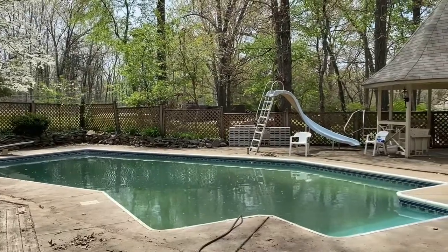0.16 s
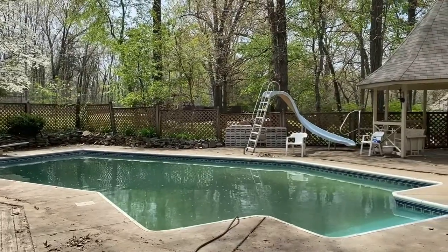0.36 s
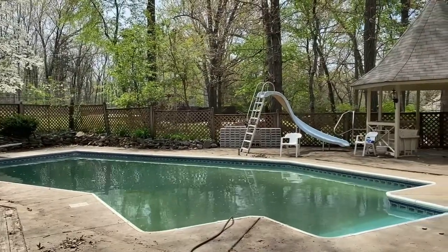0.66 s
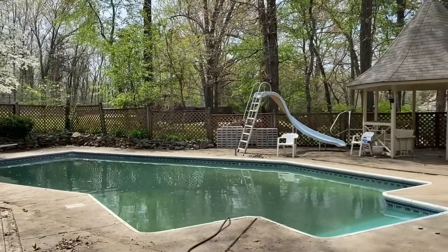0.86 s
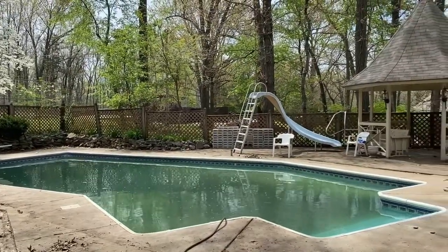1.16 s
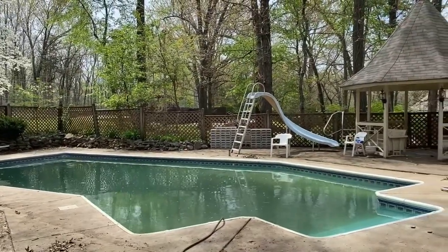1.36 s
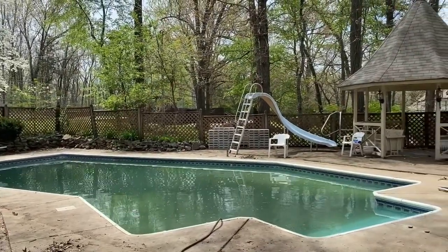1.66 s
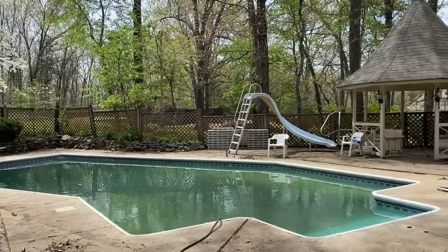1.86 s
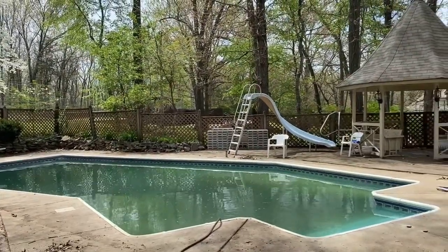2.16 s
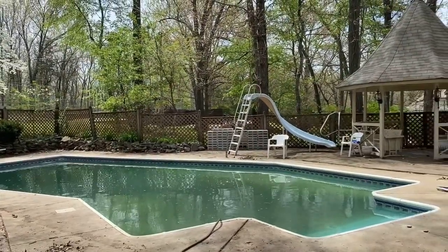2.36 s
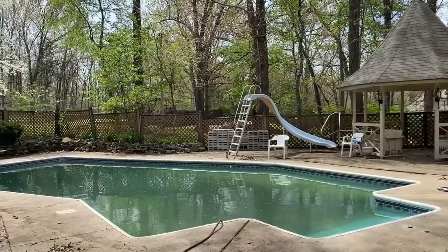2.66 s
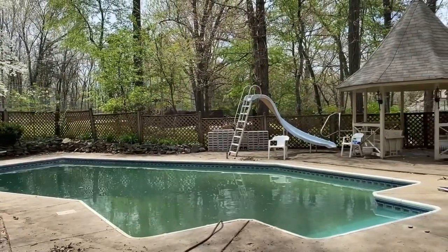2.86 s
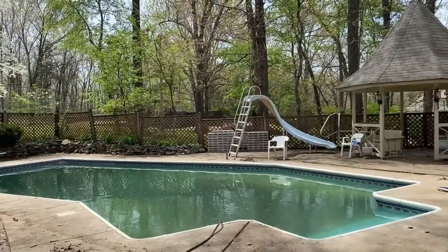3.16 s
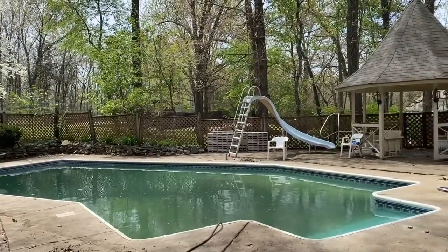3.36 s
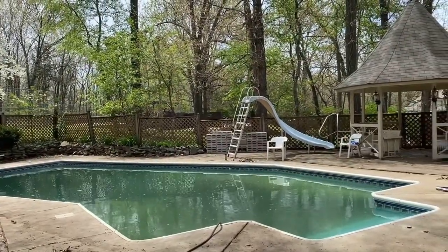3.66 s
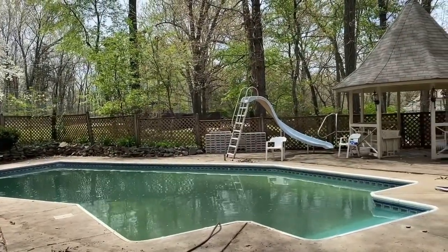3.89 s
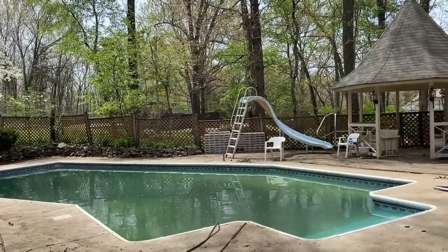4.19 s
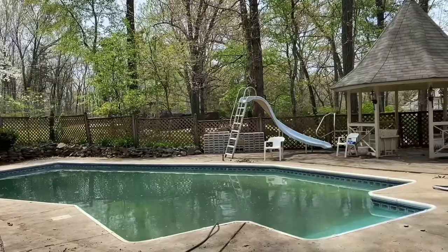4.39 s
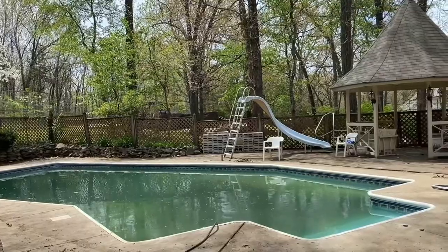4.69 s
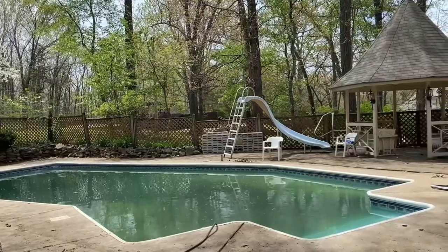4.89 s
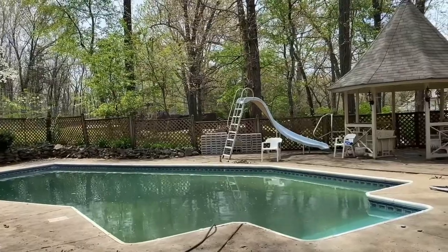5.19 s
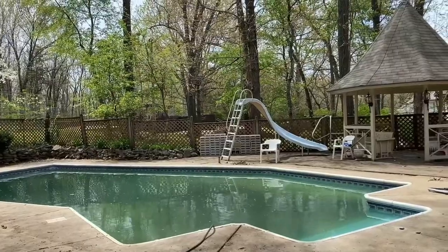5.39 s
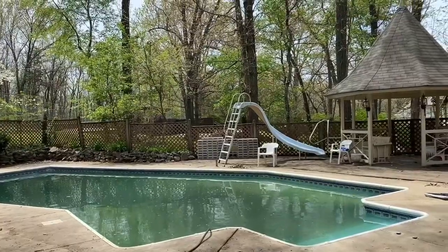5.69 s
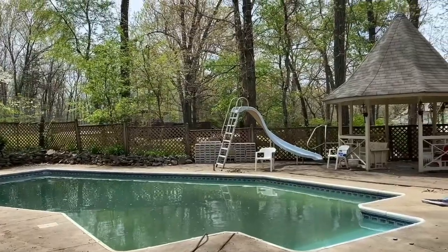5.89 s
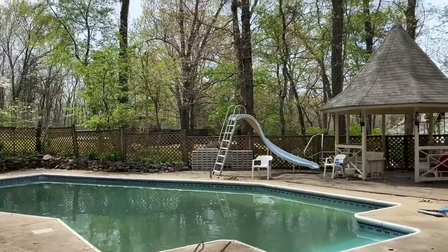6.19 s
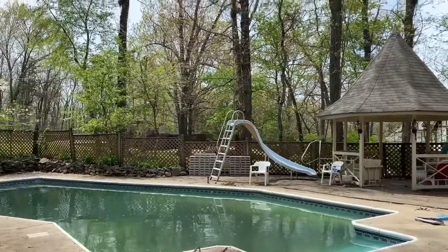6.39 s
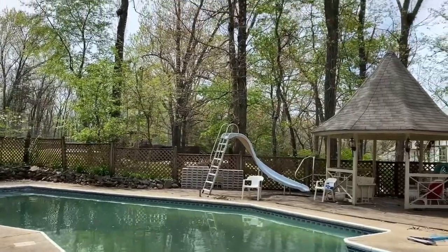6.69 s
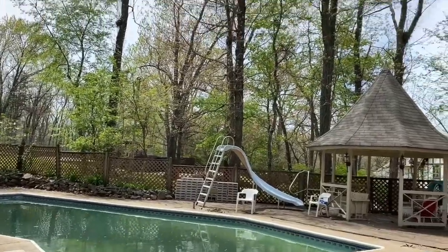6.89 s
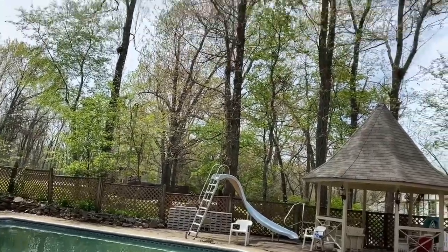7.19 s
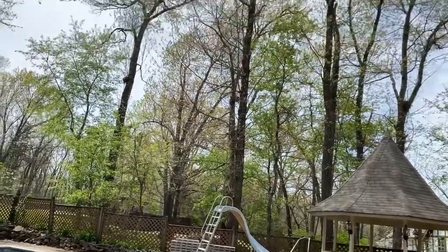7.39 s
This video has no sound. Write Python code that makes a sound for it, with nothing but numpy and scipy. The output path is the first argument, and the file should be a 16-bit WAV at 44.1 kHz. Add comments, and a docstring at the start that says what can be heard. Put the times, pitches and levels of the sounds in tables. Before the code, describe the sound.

Already running at the start and never stopping, two close-pitched toad trills fill an open garden, lightly echoed by paving, fence and trees. Behind them lie deep swelling traffic rumble, droning motors and soft, changing treble hiss. Faint wavering bird whistles and brief dry chips appear now and then. A few handling clicks on the hand-held device come in the last third, strongest near the end.

```python
"""Two toads by a garden pool

Two toads trill side by side, each a fast train of short whistled pulses thrown back by paving, fence and trees.
A bird whistles now and then from afar as wavering tones; short chips and knocks in the wood are brief tones.
A pump and a far engine hum as drifting tones over traffic rumble and a changing treble hiss of shaped noise.
Fingers on the casing of the hand-held camera tick a few times as short filtered bursts."""
import sys
import numpy as np
from scipy import signal
from scipy.fft import rfft, irfft
from scipy.io import wavfile
from scipy.ndimage import uniform_filter1d

SR = 44100
rng = np.random.default_rng(int(sys.argv[2]) if len(sys.argv) > 2 else 0)


def dump_mix(stems):
    """Bounce the given channels to the path in sys.argv[1] as a 16-bit WAV at rate SR."""
    frames = np.atleast_2d(stems).T  # one column per channel
    limited = np.clip(frames, -1, 1)  # hard clip at full scale
    pcm = np.round(limited * 32767).astype(np.int16)
    wavfile.write(sys.argv[1], SR, pcm)


N = 332756


def gain_of(db):
    """Turns decibels into a factor for the amplitude."""
    return 10 ** (np.asarray(db) / 20)


def evened(x):
    """Scales a signal to an rms (average strength) of 1."""
    return x / np.sqrt(np.mean(abs(x) ** 2) + 1e-20)


def read(points, hz):
    """Reads a curve between its points along a logarithmic frequency axis, as the ear spaces pitch."""
    f, value = np.transpose(points)
    return np.interp(np.log(hz + 1), np.log(f + 1), value)


def over_time(points, t):
    """Reads a table of times and values at the times t, in straight lines between its rows."""
    return np.interp(t, *np.transpose(points))


def add(mix, s, sound):
    """Mixes a two-channel sound in at time s, in seconds."""
    part = mix[:, round(s * SR):][:, :sound.shape[1]]
    part += sound[:, :part.shape[1]]


def ports(z, pan_db, lead):
    """Two microphone ports: the left differs in level by pan_db and leads in phase by lead, in radians."""
    left = (z * np.exp(.5j * lead)).real * gain_of(pan_db / 2)
    right = (z * np.exp(-.5j * lead)).real * gain_of(-pan_db / 2)
    return np.array([left, right])


def garden(x, t60, alike):
    """Trees and fence scatter sound: sparse taps of random sign fall 60 dB in t60 s, partly alike left and right."""
    length = SR // 2
    taps = np.zeros((2, length))
    # one tap in every 20 samples, from about 23 ms on
    at = np.arange(1000, length - 20, 20) + rng.integers(0, 20, (2, (length - 1001) // 20))
    np.put_along_axis(taps, at, rng.choice([-1., 1.], at.shape), 1)
    taps[1] = alike * taps[0] + np.sqrt(1 - alike ** 2) * taps[1]
    taps *= gain_of(-60 * np.arange(length) / SR / t60)
    wet = signal.fftconvolve(x[None], taps, axes=1)[:, :len(x)]
    return wet * np.std(x) / np.std(wet)


def air():
    """Traffic rumble, leaves and far birdsong: random short-time spectra with drifting louder and softer patches."""
    # relative spectrum of the sound common to both ports: (pitch_hz, level_db per Hz)
    common_spectrum = [(25, -27.5), (40, -9.5), (58, 6), (85, 0), (135, -9.5), (165, -11.5), (400, -21.5),
                       (1000, -28.5), (2300, -27), (3300, -35), (4200, -41.5), (5200, -42), (7600, -58.5),
                       (8500, -74), (10500, -90.5), (15500, -82)]
    # relative spectrum of the difference between the ports: (pitch_hz, level_db per Hz)
    side_spectrum = [(30, -57), (100, -30.5), (250, -31), (600, -27.5), (1200, -34), (2500, -35),
                     (3500, -36.5), (4300, -42), (5500, -46), (8000, -52), (10000, -59.5), (14000, -73),
                     (15500, -77)]
    # how far the difference follows the common sound: (pitch_hz, share from -1 to 1)
    lean_points = [(100, -0.084), (300, -0.29), (800, -0.35), (1500, 0.1), (2300, -.05), (3200, 0.04),
                   (6000, -.02), (15000, 0.026)]
    # rise and fall of the deep traffic rumble: (start_s, change_db)
    rumble_swell = [(0, -2), (.35, 3.5), (2.0, 1), (3.55, -4), (3.95, 5.5), (4.45, -2.5), (5.3, 3),
                    (5.7, -1), (6.8, 2), (7.55, -0.5)]
    # sudden changes of the treble hiss, up or down, many at the chips, which then settle:
    # (start_s, change_near_3khz_db, change_near_7khz_db)
    hiss_changes = [(0., 6, 4.5), (0.799, -1.5, 6), (1.001, 5.5, 6.5), (1.55, -0.5, 7), (2.4, 2, 3),
                    (3.25, 3.5, 5), (3.62, -0.5, 4.5), (4.82, 0.5, 4.5), (5.78, 3.5, 7.5), (5.93, 3.5, 2),
                    (6.05, 5.5, 0.5), (6.4, 7, 0), (6.52, 4.5, 6.5), (7.12, 5.5, 3.5), (7.3, -6.5, 3.5)]
    level_db, settle_s = -46.5, 0.12

    frames, hz = N // 256 + 5, np.fft.rfftfreq(1024, 1 / SR)
    t = np.arange(frames) * 256 / SR
    a, b, c, d, patches = rng.standard_normal((frames, 513, 5)).T

    # patches are random levels smoothed over pitch, then over time
    patches = evened(uniform_filter1d(uniform_filter1d(patches, 16, 0), 8, 1))
    patch_depth_db = [(80, 0.56), (300, .5), (2000, 1.3), (3300, 2.8), (5000, 3.4), (9000, 1.3)]
    patchy_db = read(patch_depth_db, hz)[:, None] * patches

    def band(centre, spread):
        """A smooth hump of pitches around a centre."""
        return np.exp(-np.log((hz[:, None] + 1) / centre) ** 2 / spread)

    swell_db = over_time(rumble_swell, t) * band(60, 0.15)
    s, lower_db, upper_db = np.transpose(hiss_changes)
    settling = (t[:, None] >= s) * np.exp(-abs(t[:, None] - s) / settle_s)
    settling -= settling.mean(0)  # keeps the average level
    swell_db += settling @ lower_db * band(2900, 0.16)
    swell_db += settling @ upper_db * band(7500, 0.16)

    mid = a + 1j * b
    lean = np.clip(read(lean_points, hz), -1, 1)[:, None]
    early = .5  # much of the sound reaches the left port first
    apart = np.sqrt(np.maximum(1 - lean ** 2 - early ** 2, 0)) * (c + 1j * d)
    side = (lean + 1j * early) * mid + apart
    mid = mid * gain_of(read(common_spectrum, hz))[:, None]
    side = side * gain_of(read(side_spectrum, hz))[:, None]
    spectra = np.array([mid + side, mid - side]) * gain_of(patchy_db + swell_db)
    sound = signal.istft(spectra, nperseg=1024, noverlap=768)[1][:, :N]
    return gain_of(level_db) * evened(sound)


def hum():
    """Wavering tones of the pump motor, and the drone of a far engine with its octave, as drifting sine waves."""
    # motor tones: (pitch_hz, width_hz, level_db, sway_db); rms pitch drift is half the width, sway is rms
    motor_tones = [(59.2, 5., -54, 2.3), (345, 6., -66, 1.8), (635, 7., -75, 2.)]
    # the far engine: (start_s, pitch_hz, level_db, octave_level_db)
    engine = [(0, 120, -54, -72), (.6, 120, -55, -72), (1.5, 134, -51, -72), (2.2, 132, -57, -72),
              (2.7, 130, -54, -72), (3.4, 141.5, -53, -70), (3.7, 140, -60, -70), (4.7, 138, -59, -70),
              (4.95, 137, -54, -69), (5.25, 135, -55, -68), (5.4, 137, -55, -61), (5.6, 139, -54, -67),
              (6.26, 141, -54, -69), (6.33, 141.5, -57, -56), (6.77, 141.5, -56, -57),
              (6.84, 141.5, -54, -67), (7.55, 141, -54, -64)]

    t = np.arange(N) / SR
    s, engine_hz, *levels = np.transpose(engine)
    engine_tones = [((k + 1) * np.interp(t, s, engine_hz), 5., np.interp(t, s, db), 3 - k)
                    for k, db in enumerate(levels)]
    out = np.zeros(N)
    for hz, width_hz, db, sway_db in [*motor_tones, *engine_tones]:
        # 120 random points joined by lines make each slow wander
        drift, sway = (evened(np.interp(np.arange(N), np.linspace(0, N, 120), r))
                       for r in rng.standard_normal((2, 120)))
        turns = np.cumsum(hz + width_hz * drift / 2) / SR
        out += gain_of(db + sway_db * sway) * np.sqrt(2) * np.sin(2 * np.pi * turns)
    return out


def ticks():
    """Fingers on the casing: a click and a dying noise burst, kept to one band and partly opposite in the ports."""
    # (start_s, level_db, centre_hz, width_hz, common_share 0-1)
    # the level is that of the part opposite in the ports; the common share is added to it
    finger_ticks = [(4.82, -68, 13500, 4000, .3), (5.103, -68, 11000, 6000, .3),
                    (5.153, -61, 12000, 7000, .2), (5.25, -60, 12000, 7000, .3),
                    (5.258, -63, 12000, 7000, .3), (5.337, -38.5, 500, 260, .7),
                    (5.81, -63, 13000, 5000, .3), (6.5175, -42, 4800, 2200, .8),
                    (6.5177, -57, 13500, 5000, .5), (6.526, -63, 13500, 4000, .5),
                    (7.4115, -45, 3500, 6000, .6), (7.4115, -60, 13000, 5000, .5),
                    (7.4125, -33.5, 850, 1100, .6)]
    out, hz = np.zeros((2, N)), np.fft.rfftfreq(1024, 1 / SR)
    n = np.arange(1024)
    for s, db, centre, width, common in finger_ticks:
        burst = rng.standard_normal(1024) * np.exp(-n / 20.) + 7.7 * (n == 0)
        burst = irfft(rfft(burst) / (1 + ((hz - centre) / width * 2) ** 4))
        burst = np.roll(burst, 512) * np.hanning(1024)  # its click sits in the middle
        burst = gain_of(db) * burst / abs(burst).max()
        add(out, s - 512 / SR, burst * np.array([[common + 1], [common - 1]]))
    return out


def birds():
    """Short chips and knocks: brief roughened tones, some sliding and some level, with the wood ringing after."""
    # the clearest chips and knocks, and at 2.158 s a lone note of the far whistling bird: # (start_s, level_db,
    # pitch_hz, left_minus_right_db, length_ms, glide as share of pitch) # level is before roughening; length
    # and glide are typical values that chance then varies
    chirps = [(.372, -56, 3250, -2, 12, 0), (.372, -60, 4080, -2, 12, .03), (.7991, -69, 6840, 4, 7, .2),
              (.8334, -65, 4900, 2.5, 6, -.15), (.848, -63, 4950, 2.5, 8, -.18),
              (1.0151, -67, 4840, 8, 16, -.05), (1.178, -69, 5450, 2, 20, -.12),
              (1.5505, -66, 5450, 9, 7, -.18), (2.158, -58, 2440, 1, 34, 0), (2.275, -66, 4700, 0, 8, -.05),
              (2.342, -54, 3200, 1.5, 16, .02), (2.344, -56, 2800, 1.5, 12, 0),
              (2.431, -63, 4500, 0, 4, -.3), (2.4746, -71, 7180, 0, 7, .15), (2.53, -55, 3200, 0, 13, .05),
              (2.53, -57, 2800, 0, 12, 0), (2.55, -56, 2750, 0, 18, -.03), (2.737, -55, 3230, 1.5, 14, .03),
              (3.4167, -62, 3945, -1, 10, .05), (3.624, -66, 5640, -.5, 6, .3),
              (3.7245, -63, 4570, -1, 6, -.11), (4.2114, -56, 3216, -3, 13, .05),
              (4.5153, -53, 2720, 2.5, 12, .08), (4.8304, -66, 5690, -1, 8, .2),
              (5.1108, -63, 4610, 3.5, 9, -.12), (5.3379, -62, 5190, .5, 6, -.12),
              (5.7764, -67, 6340, 1, 7, .2), (5.9729, -65, 5000, 2, 14, -.05), (6.2, -66, 5200, 1, 8, -.08),
              (6.22, -65, 5500, 1, 14, -.08), (6.25, -65, 5300, 1, 9, -.1), (6.275, -66, 5400, 1, 8, -.1),
              (6.463, -66, 5500, 1, 14, -.08), (6.814, -66, 5240, .5, 7, -.15)]
    # fainter chips at random moments
    twitter_per_s, twitter_db, twitter_hz = 5, (-72, -67), (4200, 5600)
    twitter_ms, twitter_glide = 10., -.1  # typical length, and glide as share of pitch
    wet_db = -6  # ringing of the wood against the chips

    when, loud, high, side = rng.random((round(twitter_per_s * N / SR), 4)).T
    faint = [(a * N / SR, np.interp(b, [0, 1], twitter_db), np.interp(c, [0, 1], twitter_hz),
              10 * d - 5, twitter_ms, twitter_glide)
             for a, b, c, d in zip(.98 * when + .01, loud, high, side)]
    rows, dry = [*chirps, *faint], np.zeros((2, N))
    variety = rng.uniform(0.78, 1.5, (len(rows), 2))  # factors on length and glide
    for (s, db, hz, pan_db, ms, glide), (stretch, bend) in zip(rows, variety):
        age = np.linspace(0, 1, round(ms * stretch * SR / 1000))
        rough = evened(np.convolve(rng.standard_normal(2000), np.hanning(100), "same"))
        husk = 1 + .5 * rough[:len(age)]  # leaves roughen the sound
        turns = np.cumsum(hz * (1 + glide * bend * (age - .5))) / SR
        chip = gain_of(db) * husk * np.sin(np.pi * age) * np.exp(2j * np.pi * turns)
        add(dry, s - .002, ports(chip, pan_db, 0.24))
    return dry + gain_of(wet_db) * garden(dry[0], .4, .3)


def whistler():
    """A far bird's thin notes: tones that flutter and break as the air moves, blurred by the distance."""
    # (start_s, length_s, level_db at the onset, pitch_hz, offset_hz from which the note slides in)
    whistles = [(0., .11, -59, 2450, 20), (.12, .13, -60, 2465, -90), (.27, .13, -60, 2465, -60),
                (.42, .115, -60, 2455, -40), (.55, .14, -61, 2460, -90), (4.01, .1, -65, 2450, -20),
                (4.13, .14, -65.5, 2450, -90), (4.28, .145, -62, 2450, -110), (4.44, .14, -61.5, 2430, -30),
                (4.6, .14, -61.5, 2425, -40), (4.76, .13, -62.5, 2425, -50), (7.12, .09, -61, 2410, 0),
                (7.23, .07, -68, 2405, 0), (7.31, .115, -59.5, 2425, 30), (7.452, .1, -58.5, 2425, 70)]
    onset_db = 1.  # a note starts this much above its held level
    scoop_s = .025  # time of the slide to pitch and of the settling to the held level
    flutter_db, waver_hz = 4., 9.  # how strongly level and pitch are broken up by the air

    dry = np.zeros((2, N))
    for s, length, level_db, hz, scoop_hz in whistles:
        age = np.arange(0, length, 1 / SR)
        flutter, waver = (evened(uniform_filter1d(uniform_filter1d(r, 260), 260))[:len(age)]
                          for r in rng.standard_normal((2, SR // 4)))
        # rises are capped, so the flutter mostly makes dips
        broken = evened(gain_of(flutter_db * np.minimum(flutter, 1)))
        settling = gain_of(-onset_db * np.minimum(age / scoop_s, 1))
        loudness = gain_of(level_db) * settling * broken * signal.windows.tukey(len(age), .2)
        turns = np.cumsum(hz + scoop_hz * np.exp(-age / scoop_s) + waver_hz * waver) / SR
        add(dry, s, ports(np.sqrt(2) * loudness * np.exp(2j * np.pi * turns), 0.3, 0.28))
    return dry + gain_of(-8) * garden(dry[0], .25, .6)


def toad(pace, begun, voice, pulse, echoes, jitter_ms, uneven_db, uneven_hz, octave, lead, wet_db):
    """A vocal sac pulses: each pulse starts the whistle afresh, and the trill already runs when the scene opens."""
    reedy_db_per_hz = .13  # slack folds sound reedier: the octave grows where the pitch bends down
    s, level_db, hz, pan_db = np.transpose(voice)
    early = SR // 10  # start a little before time zero
    t = np.arange(-early, N) / SR

    # count pulses along the trill; begun is the share of a period already gone at time zero
    pulses = np.cumsum(over_time(pace, t)) / SR
    pulses += begun - pulses[early]
    whole = np.arange(np.ceil(pulses[0]), pulses[-1])
    chance = rng.standard_normal((len(whole), 3))
    starts = np.interp(whole, pulses, t) + jitter_ms * chance[:, 0] / 1000
    k = np.maximum(np.searchsorted(starts, t) - 1, 0)  # which pulse sounds now
    age_ms = (t - starts[k]) * 1000

    ms, shape_db, bend_hz = np.transpose(pulse)
    swell = np.interp(age_ms, ms, gain_of(shape_db), 0, 0) * gain_of(uneven_db * chance[k, 1])
    bend = np.interp(age_ms, ms, bend_hz)
    turns = np.cumsum(np.interp(t, s, hz) + bend + uneven_hz * chance[k, 2]) / SR
    turns -= np.interp(starts, t, turns)[k]  # each pulse restarts the wave

    reedy_db = np.clip(-reedy_db_per_hz * bend, 0, 13)
    overtone = gain_of(over_time(octave, t) + reedy_db) * np.exp(4j * np.pi * turns)
    call = swell * (np.exp(2j * np.pi * turns) + overtone)
    call = call + sum(gain_of(db) * np.roll(call, round(delay * SR / 1000)) for delay, db in echoes)
    heard = ports(call, np.interp(t, s, pan_db), lead) + gain_of(wet_db) * garden(call.real, 0.59, 0.82)
    return (evened(heard) * gain_of(np.interp(t, s, level_db)))[:, early:]


def low_toad():
    """The lower toad: its sac whistles near 1700 Hz, about 31 pulses a second."""
    # pace of the trill, slowing overall as the toad tires: (start_s, pulses_per_s)
    pace = [(0, 33.19), (.4, 32.38), (1.4, 32.15), (2.2, 31.2), (3.2, 31.09), (3.6, 31.33), (4.6, 30.82),
            (5.1, 30.32), (5.8, 31.56), (6.1, 30.2), (6.5, 30.68), (7.55, 29.74)]
    # voice as the camera turns: (start_s, level_db, pitch_hz, left_minus_right_db)
    voice = [(0, -40, 1753, 0.1), (.9, -38.5, 1721, -0.2), (2.1, -39.5, 1723, -0.5),
             (3.2, -39.5, 1722, -0.5), (4.1, -39, 1720, -1), (4.6, -40.5, 1716, -0.5),
             (5.4, -39.5, 1714, 0), (6.298, -39.5, 1711, -0.5), (6.8, -37.5, 1709, 0.5),
             (7.55, -38.5, 1708, 1.5)]
    # one pulse of the vocal sac: (age_ms, relative_level_db, pitch_bend_hz)
    pulse = [(0, -59.5, 44.5), (1.3, -2.5, -99.5), (3.25, -0.3, -15), (6.5, 1, 15.5), (11.9, 0, -3),
             (15, -2, -109), (16.5, -58.5, 70.5)]
    # single reflections: (delay_ms, level_db against the direct call)
    echoes = [(7.54, -13), (9.22, -15.5), (11.47, -12), (18.36, -14)]
    # octave against the whistle, before any reediness: (start_s, level_db)
    octave = [(0, -37.5), (2, -33.5), (4, -34), (4.8, -33), (6, -34), (6.8, -38.5), (7.55, -41.5)]
    return toad(pace, .51, voice, pulse, echoes, jitter_ms=0.393, uneven_db=0.32, uneven_hz=4.0,
                octave=octave, lead=.3, wet_db=-14.0)


def high_toad():
    """The higher toad: its sac whistles near 1950 Hz, about 36 pulses a second."""
    # pace of the trill, slowing overall as the toad tires: (start_s, pulses_per_s)
    pace = [(0, 37.59), (.51, 37.96), (1.81, 37.05), (2.01, 37.6), (2.61, 38.21), (4.01, 35.19),
            (4.21, 36.34), (5.21, 36.41), (5.51, 34.83), (5.8, 34.58), (6.05, 33.86), (6.3, 34.14),
            (6.6, 35.4), (6.9, 35.88), (7.01, 36.2), (7.56, 34.3)]
    # voice as the camera turns: (start_s, level_db, pitch_hz, left_minus_right_db)
    voice = [(0, -44, 1925, 2.5), (.4, -43.5, 1954, 2.2), (0.999, -43.5, 1949, 2.3), (2.2, -43, 1952, 2.5),
             (2.6, -44, 1966, 1.7), (3.1, -43, 1958, 1.6), (4.199, -42.5, 1947, 1.4),
             (4.999, -43.5, 1956, 1.2), (5.6, -42.5, 1947, 1.3), (6.4, -43.5, 1910, 2),
             (7.05, -42.5, 1995, 2.6), (7.55, -44, 1974, 4.2)]
    # one pulse of the vocal sac: (age_ms, relative_level_db, pitch_bend_hz)
    pulse = [(0, -60, 35), (1.8, -5.8, 20), (3.5, -.6, 27), (5.5, -.3, 36), (8, -2.3, -24),
             (10.1, -10, -15), (12.3, -60, 0)]
    # single reflections: (delay_ms, level_db against the direct call)
    echoes = [(11.54, -7.5), (15.17, -9), (17.81, -1.7), (29.48, -14.5)]
    # octave against the whistle, before any reediness: (start_s, level_db)
    octave = [(0, -39.5), (7.55, -35.5)]
    return toad(pace, .933, voice, pulse, echoes, jitter_ms=0.502, uneven_db=0.21, uneven_hz=5.5,
                octave=octave, lead=.41, wet_db=-16)


def scene():
    """Toads in front, everything else behind them."""
    return low_toad() + high_toad() + whistler() + birds() + ticks() + air() + hum()


def record(dry):
    """The microphone loses the deepest bass, then the recorder cuts off the highest treble."""
    edge_hz = 15800
    faded = dry * signal.windows.tukey(N, .001)  # a few ms of fade at either end
    thin = signal.sosfilt(signal.butter(4, 43., "high", fs=SR, output="sos"), faded)
    treble_cut = signal.firwin(511, edge_hz, window=("kaiser", 9), fs=SR)
    return signal.oaconvolve(thin, treble_cut[None], "same")


dry = scene()
out = record(dry)
dump_mix(out)
```